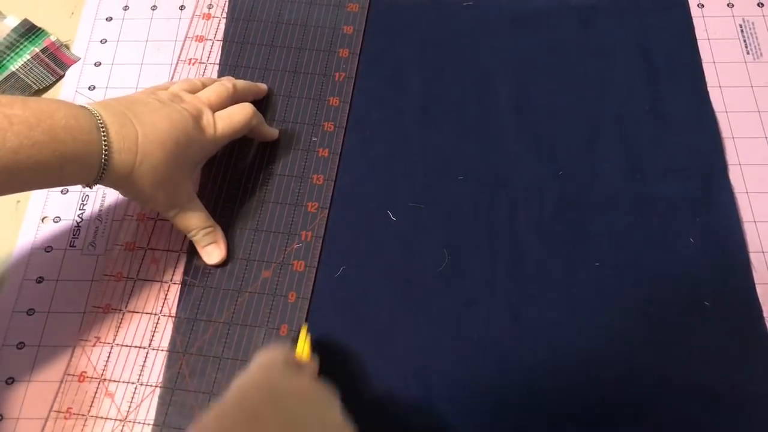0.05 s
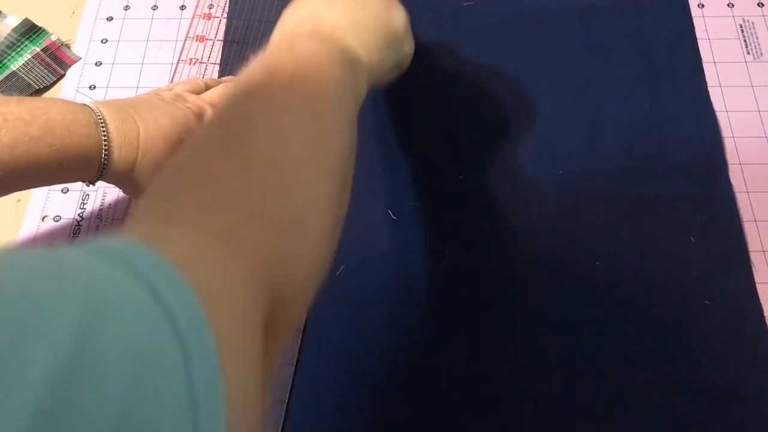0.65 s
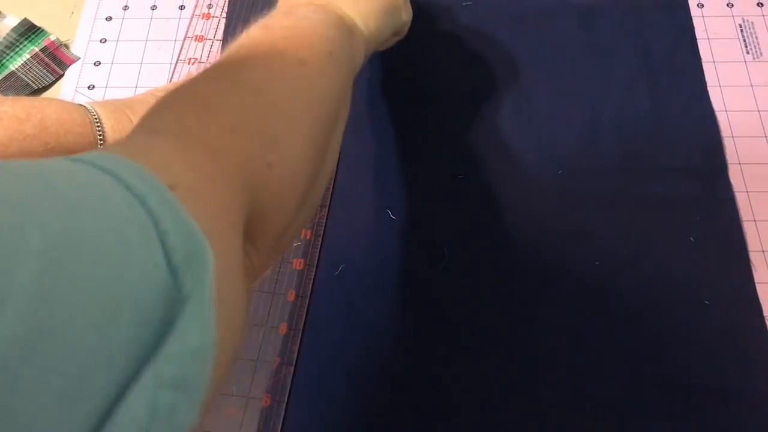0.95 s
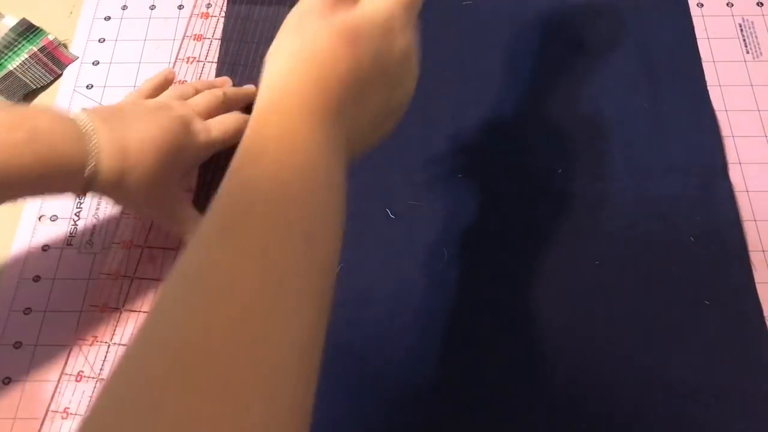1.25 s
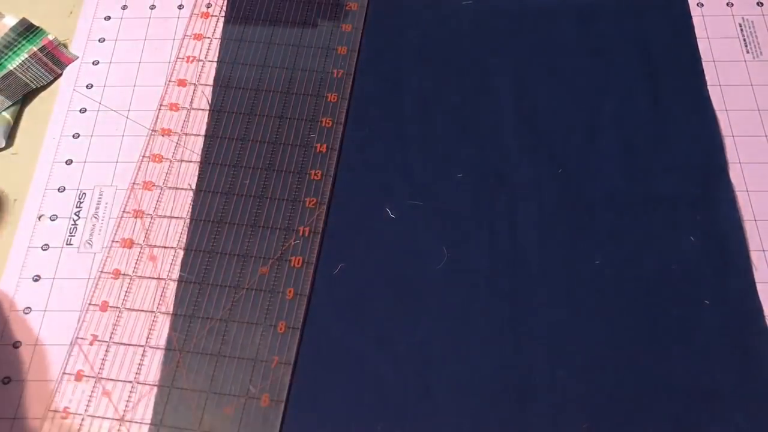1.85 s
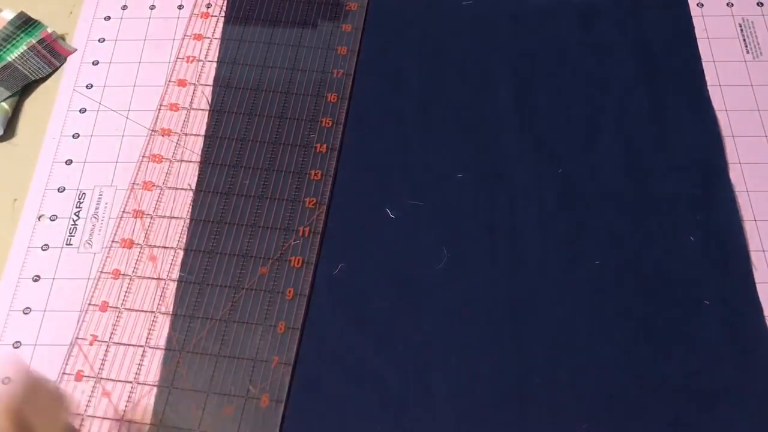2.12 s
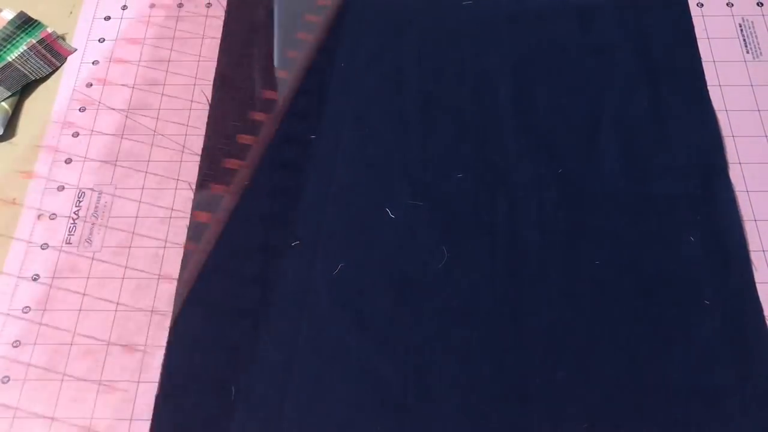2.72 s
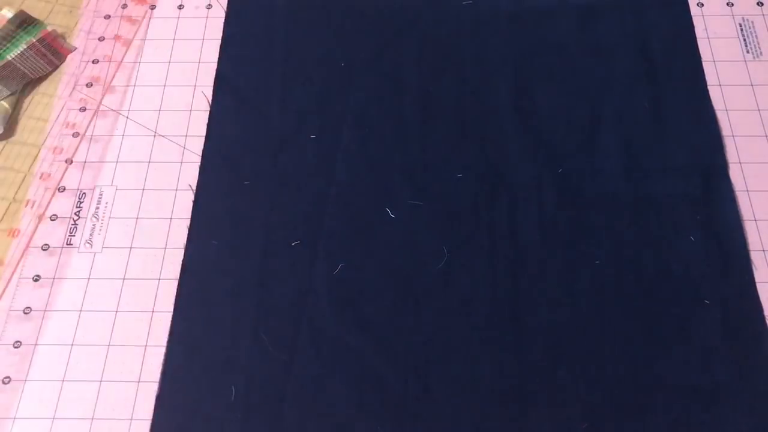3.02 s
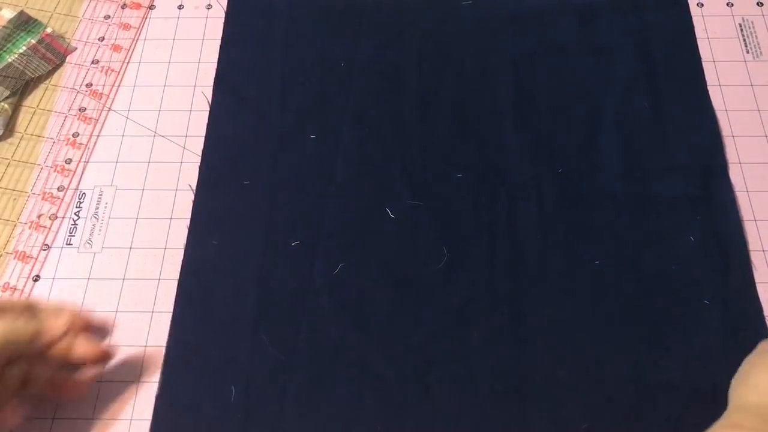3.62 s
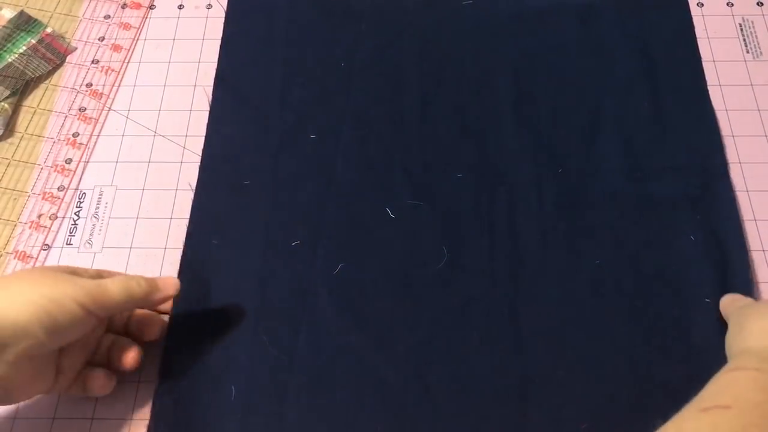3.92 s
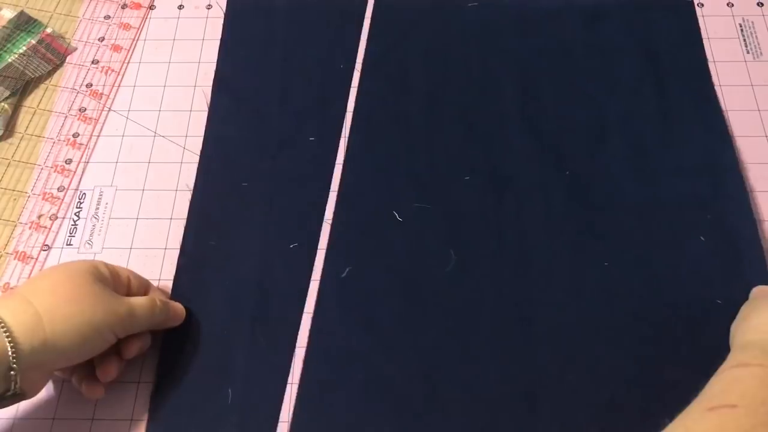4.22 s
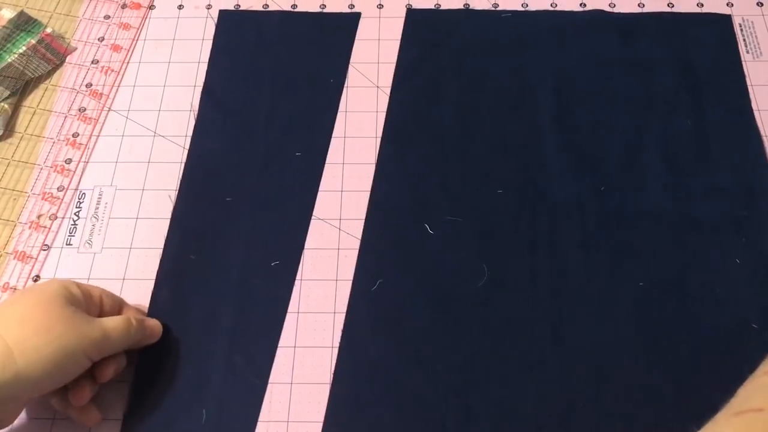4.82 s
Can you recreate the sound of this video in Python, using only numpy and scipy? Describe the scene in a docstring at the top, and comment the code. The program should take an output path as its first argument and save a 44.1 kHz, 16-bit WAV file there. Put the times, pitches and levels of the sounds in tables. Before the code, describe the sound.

A cutting wheel rumbles and crunches through cloth, then clatters onto a table before a plastic ruler taps and fabric slides.

```python
"""A rotary cutter rolls through cloth along a plastic ruler: the wheel rumbles on the mat, threads part.
Its guard clicks, then it is put down, and the impacts excite its body, its hollow handle and the table.
The ruler taps and slides aside, an arm brushes a hollow stand, and the cut strip is drawn away;
each rubbing sound is stick-slip friction filtered by the resonances of the body rubbed.
The room is small; elsewhere in the house a machine hums as it unevenly spins up."""
import sys
import numpy as np
from scipy import signal
from scipy.fft import rfft, irfft, next_fast_len
from scipy.io import wavfile
from scipy.ndimage import uniform_filter1d, map_coordinates

SR = 44100
rng = np.random.default_rng(int(sys.argv[2]) if len(sys.argv) > 2 else 0)


def file_out(sig):
    """Save sig as 16-bit WAV at sys.argv[1]."""
    # one column per channel
    cols = np.atleast_2d(sig).T
    # limit, then scale
    lim = np.clip(cols, -1, 1)
    pcm = np.round(lim * 32767).astype(np.int16)
    wavfile.write(sys.argv[1], SR, pcm)


N = 223417

# the cutter meeting the table: t/s, body level/dB, contact t60/s, tilt/(dB/decade), handle level/dB
LANDINGS = [(1.9548, -32, 0.015, -2, -65), (1.958, -34.5, 0.0086, -4, -51), (2.0498, -17, 0.0087, 1, -11),
            (2.054, -24.5, 0.03, -4, -30), (2.061, -32, 0.013, 4, -38), (2.073, -29, 0.028, -5.5, -39),
            (2.077, -26.5, 0.021, -8.5, -36)]


def cutting():
    """Common excitation: one push drives the sounds of the cut, which die as the wheel leaves the cloth."""
    push = [(0, -2.5), (.12, -1.6), (.2, 0), (.275, 0.9), (.325, -1.3), (.44, 1.2), (.525, -1.2),
            (.61, -1.0), (.7, -3.5), (.77, -6.5), (.86, -12.5), (.89, -10.5)]  # easing as the arm stretches out: t/s, level/dB
    run_off_s, decay_db_per_s = push[-2][0], 330
    t = np.arange(N) / SR
    push_db = np.interp(t, *np.transpose(push))
    pressure = wobble(55.3)
    out = table_tone(push_db) + wheel_rumble(push_db, pressure) + thread_crunch(push_db, pressure)
    out += blade_rasp()
    out *= amp(-decay_db_per_s * np.maximum(t - run_off_s, 0))
    return out + thread_snaps()


def wheel_rumble(push_db, pressure):
    """Rolling noise: small slips of the wheel on the mat, growing faster than the push."""
    spectrum = [(100, -22.5), (190, -6), (260, -1.5), (335, -2.5), (430, -2), (520, -3.5), (640, -5),
                (830, -8), (1050, -11.5), (1180, -5), (1300, -32), (2500, -31.5)]  # wheel on mat: f/Hz, level/dB
    rumble = shifting(friction(spectrum, rate=2500, spread_db=1.0), depth_db=1.0, size=2048, frames=5)
    return amp(-48.5 + 1.82 * push_db + 0.18 * pressure) * rumble


def table_tone(push_db):
    """Driven resonance: under a firm push the table top sings a narrow band of noise."""
    pitch = [(0.08, 322.2), (0.16, 256.5), (0.22, 335), (0.48, 348), (0.56, 321.5), (0.63, 264.8),
             (0.8, 265)]  # the note shifts as the wheel travels: t/s, f/Hz
    phase = 2 * np.pi * np.cumsum(np.interp(np.arange(N) / SR, *np.transpose(pitch))) / SR
    width_hz = 55
    tone = unit(wobble(width_hz) * np.cos(phase) + wobble(width_hz) * np.sin(phase))
    return amp(-54.5 + 1.5 * push_db) * tone


def thread_crunch(push_db, pressure):
    """Fracture noise: thousands of fine threads part each second and merge into a crunch."""
    spectrum = [(600, -11.5), (1150, -4), (1500, -12), (2100, -9), (2700, -6.3), (3340, -5.5), (3900, -8),
                (4600, -7.5), (6800, -11), (8850, -14), (10300, -20), (11500, -17.5), (13000, -17),
                (14000, -18.5), (16000, -30)]  # parting threads: f/Hz, level/dB
    crunch = shifting(friction(spectrum, rate=7000, spread_db=0.5), depth_db=2.1)
    return amp(-49.5 + push_db + 0.37 * pressure) * crunch


def thread_snaps():
    """Impulsive fracture: each thick thread breaks under the blade with a click of its own."""
    snaps = [(0.092, -48), (0.193, -35.5), (0.2792, -33), (0.366, -36), (0.4521, -33.5), (0.752, -37.5)]  # t/s, relative level/dB
    spectrum = [(800, 3.0), (2800, 6.5), (7000, 4.0), (16000, -15.5)]  # f/Hz, level/dB
    out = np.zeros(N)
    for s, db in snaps:
        add(out, s, amp(db + 1.0) * blow(spectrum, t60=0.0098, grit=2.1))
    return shifting(out, depth_db=4.0, size=128)


def blade_rasp():
    """Stick-slip friction: now and then the blade leans on the ruler."""
    moves = [(.13, -57, 0.075, 0.026, 0.24), (.53, -57, 0.18, 0.041, 0.18), (.7, -53.5, 0.13, .02, 0.29)]  # t/s, level/dB, rise/s, hold/s, fall/s
    spectrum = [(600, -17), (1150, -3.5), (1450, 2.5), (1800, 2.5), (2200, -10), (2700, -3), (3200, -18),
                (8000, -37)]  # blade on plastic: f/Hz, level/dB
    return rubs(moves) * friction(spectrum, rate=1500, spread_db=2.5)


def guard():
    """Friction and impact: the blade guard slides and clicks; the grip selects which handle mode rings."""
    slide = [(1.6, -61, 0.24, 0.013, .04)]  # t/s, level/dB, rise/s, hold/s, fall/s
    clicks = [(1.091, -44.5, 3470, 18), (1.4991, -36.5, 2060, 23), (1.6026, -42, 1400, 0),
              (1.606, -39.5, 1400, 5), (1.616, -35.5, 1420, 23), (1.62, -37.5, 2150, 15),
              (1.6821, -34.5, 3100, -1)]  # t/s, relative level/dB, mode f/Hz, mode boost/dB
    spectrum = [(100, -20), (300, -28), (800, -4.5), (1400, -14), (2000, -18.5), (3000, -4.5), (4600, -7),
                (5500, 6), (6200, 1.5), (7000, -0.5), (8000, -10.5), (13000, -14), (16000, -24)]  # the guard inside the closed hand: f/Hz, level/dB
    out = rubs(slide) * friction(spectrum, rate=4000, spread_db=13.0)
    for s, db, hz, boost_db in clicks:
        body = peaked(spectrum, [(hz, 0.37 * hz, boost_db)])
        add(out, s, amp(db - 3.5) * blow(body, t60=0.011, grit=3.7))
    return out


def cutter_landing():
    """Hard impact: brief broadband contacts as the cutter lands heel first and rattles flat."""
    spectrum = [(150, -5), (340, -1), (480, -8.5), (660, -18), (950, -17.5), (1150, -5), (1380, -11),
                (1800, -5), (2150, -5.5), (2650, -3.5), (3100, -1), (3800, -2.5), (4500, -8), (6000, -10),
                (8000, -13.5), (10300, -17.5), (13000, -14), (16000, -28.5)]  # its hard body: f/Hz, level/dB
    out = np.zeros(N)
    for s, db, t60, tilt_db, _ in LANDINGS:
        add(out, s, amp(db) * blow(tilted(spectrum, tilt_db), t60, grit=4.0))
    return out


def handle_pop():
    """Damped free vibration: each landing rings the hollow handle for a few cycles."""
    modes = [(1420, -3.5, 0.0081), (1663, -2, 0.0074), (3160, -10.5, 0.01), (3750, -12.5, 0.011),
             (5450, -7.5, 0.0052)]  # f/Hz, relative level/dB, t60/s
    out, t = np.zeros(N), np.arange(SR // 8) / SR
    hz, mode_db, t60 = np.transpose(modes)[:, :, None]
    partials = amp(mode_db - 60 * t / t60) * np.sin(2 * np.pi * hz * t)
    attack = 1 - np.exp(-t / 0.0013)
    pop = partials.sum(axis=0) * attack
    for s, *_, db in LANDINGS:
        add(out, s, amp(db) * pop / abs(pop).max())
    return out


def table_thuds():
    """Modal response: a soft blow excites one band of table modes; a resting hand or tool damps them."""
    thuds = [(1.092, -47, 380, 0.54), (1.956, -22.5, 573, 0.33), (1.958, -21.5, 153, 0.65),
             (1.993, -24, 100, 0.54), (2.052, -24.5, 365, 0.7), (2.0802, -18, 280, 0.29),
             (2.116, -31, 226, 0.38), (2.705, -39, 167, 1.73), (3.221, -38.5, 259, 1.5),
             (3.243, -50, 279.8, 1.2), (3.365, -54, 310, 2.5), (3.618, -44, 252, 0.37),
             (3.83, -40, 195, 0.93)]  # t/s, level/dB, band centre f/Hz, factor on t60
    modes = [(119.75, 1.5, 0.13), (168, 3, 0.079), (231, -0.5, 0.059), (280.4, 3.5, 0.048),
             (348, -3.5, 0.077), (415, -6, 0.047), (560, 5.5, 0.037), (756, -28, 0.044)]  # f/Hz, relative level/dB, nominal t60/s
    half_width_octaves = 0.34
    out, t = np.zeros(N), np.arange(SR // 4) / SR
    hz, mode_db, t60 = np.transpose(modes)[:, :, None]
    attack = 1 - np.exp(-t / 0.0014)
    for s, db, centre_hz, ring in thuds:
        excitation = np.exp(-(np.log2(hz / centre_hz) / half_width_octaves) ** 2)
        partials = excitation * amp(db + mode_db - 60 * t / (ring * t60)) * np.sin(2 * np.pi * hz * t)
        add(out, s, partials.sum(axis=0) * attack)
    return out


def plastic_slides():
    """Friction-driven bending modes: a sliding edge chatters and rings as far as the cloth allows."""
    # first the cutter, then the ruler: t/s, level/dB, rise/s, hold/s, fall/s, freedom to ring (0-1)
    slides = [(2.123, -50, 0.018, 0.0031, 0.062, 0.6), (2.498, -56.5, 0.0079, 0.0041, 0.012, 0.5),
              (2.705, -64, 0.061, 0.026, 0.066, 0.3), (2.764, -58.5, 0.011, .003, 0.012, 0.4),
              (2.92, -52.5, 0.004, 0.022, 0.049, 1), (2.972, -56.5, 0.013, 0.02, 0.064, 0.86),
              (3.024, -63.5, 0.03, 0.02, 0.051, 0.9), (3.238, -58, 0.031, .003, 0.035, 0.5)]
    spectrum = [(200, 8.5), (420, -1), (700, -1.5), (1400, -8), (2100, -8), (4000, -3), (7500, -12.5),
                (12000, -8.5), (16000, -13.5)]  # the sliding edge: f/Hz, level/dB
    modes = [(690, 240, 6.5), (990, 130, 10.5), (1710, 340, 16.5), (2420, 130, 8), (2830, 300, 15),
             (3310, 160, 5), (4100, 400, 2.5), (5700, 600, 7), (9000, 1200, 11.5)]  # the ruler bending: f/Hz, width/Hz, boost when free/dB
    out = np.zeros(N)
    for *move, freedom in slides:
        body = peaked(spectrum, [(hz, width, freedom * db) for hz, width, db in modes])
        out += rubs([move]) * friction(body, rate=4700, spread_db=5.0)
    return shifting(out, depth_db=3.0, frames=6) * amp(1.8 * wobble(83))


def ruler_taps():
    """Light impact: ruler and fingers tap, and a harder contact sounds brighter."""
    taps = [(1.164, -52.5, 8), (1.279, -50.5, 8), (1.3586, -47.5, -7), (1.3771, -49.5, 2),
            (2.491, -51.5, -1), (2.499, -56, -4), (2.698, -36.5, -4), (2.6998, -36, 3), (2.7013, -27, 2),
            (2.915, -46, 6), (3.22, -44, -23), (3.242, -36.5, -5), (3.245, -37, -17), (3.31, -43.5, -15),
            (3.323, -42, 16), (3.365, -41.5, 3), (3.429, -49, 15), (3.505, -52.5, 12)]  # t/s, level/dB, tilt/(dB/decade)
    spectrum = [(150, -2.5), (300, 3), (520, -8), (700, -2.5), (950, 3.5), (1160, 3), (1380, -2),
                (1800, -6), (2500, -2), (3000, 0), (3450, -5), (4100, -4), (5360, -6), (7500, -11),
                (8700, -5), (10500, -13.5), (13100, -9.5), (14400, -18), (16000, -18.5)]  # struck plastic: f/Hz, level/dB
    out = np.zeros(N)
    for s, db, tilt_db in taps:
        add(out, s, amp(db) * blow(tilted(spectrum, tilt_db), t60=0.0075, grit=2.5))
    return out


def cloth():
    """Fibre friction: dense slips rustle under hands and sleeves; light sliding gives a fine high hiss."""
    sweeps = [(.9, -72.5, 0.37, 0.057, 0.33), (1.11, -66.5, 0.43, 0.012, 0.038),
              (1.6, -62.5, 0.69, 0.0057, 0.09), (2.02, -63.5, 0.074, 0.066, 0.12),
              (2.22, -65, 0.36, 0.048, 0.047), (2.585, -62, 0.074, 0.01, 0.036),
              (2.68, -65.5, 0.12, 0.0094, 0.1), (3.32, -64.5, 0.13, 0.1, 0.63),
              (3.65, -67, 0.22, 0.48, 0.19), (4.52, -74, .15, 0.022, 0.23)]  # hands and sleeves: t/s, level/dB, rise/s, hold/s, fall/s
    # fingertips, the skidding cutter, the lifted cloth: t/s, level/dB, rise/s, hold/s, fall/s
    glides = [(1.12, -71, .08, 0.092, 0.33), (1.56, -67, .15, 0.03, .04), (2.12, -62, .02, .02, .06),
              (5.02, -71.5, .08, .05, 0.11)]
    sweep_spectrum = [(200, 8.5), (600, 1), (1400, 4), (2400, 2.5), (4200, -3.5), (5500, -2), (6800, -7.5),
                      (8000, -11), (13000, -10), (16000, -18.5)]  # f/Hz, level/dB
    glide_spectrum = [(2000, -14), (7000, -1), (10300, -3), (13000, -2), (16000, 2)]  # f/Hz, level/dB
    motion = np.hypot(rubs(sweeps), amp(-84))  # the hands never lie quite still
    rustle = motion * friction(sweep_spectrum, rate=7000, spread_db=0.5)
    hiss = rubs(glides) * friction(glide_spectrum, rate=12000, spread_db=4.0)
    return (rustle + hiss) * amp(1.9 * wobble(35))


def stand_and_strip():
    """Friction and resonance: an arm brushes a hollow stand, then the cut strip slides over the mat."""
    brushes = [(3.66, -60, 0.036, 0.0043, 0.072), (3.706, -42, 0.013, 0.024, 0.049),
               (3.846, -38.5, 0.029, 0.015, 0.092), (4.03, -73, .1, 0.09, 0.28),
               (4.3, -78.5, 0.2, 0.39, 0.3), (4.5, -71.5, 0.097, 0.082, 0.12),
               (4.715, -71, 0.11, 0.01, 0.055), (4.83, -65.5, 0.05, 0.017, 0.032),
               (4.978, -69.5, 0.031, 0.0086, .04)]  # the arm, from 4.5 s the strip: t/s, level/dB, rise/s, hold/s, fall/s
    catches = [(3.275, -30.5), (3.281, -35), (3.299, -43), (3.616, -39.5), (3.652, -32), (3.696, -37),
               (3.7244, -29), (3.7285, -22), (3.734, -29), (3.769, -34), (3.8279, -22), (3.844, -37),
               (3.848, -25), (4.085, -37)]  # the stand catching and letting go: t/s, relative level/dB
    spectrum = [(200, -19.5), (320, -10.5), (440, -23.5), (550, -30.5), (800, -15), (1000, 1), (1380, 1),
                (1600, -6), (1900, -9), (2250, -16), (3000, -23), (5200, -22), (6500, -33), (10000, -39.5),
                (16000, -48)]  # hollow band shared by all rubs and catches: f/Hz, level/dB
    modes = [(1070, 39, 4), (1205, 43, 1), (1410, 42, 4), (1782, 50, 4), (2770, 100, 9)]  # resonances colouring the rubs: f/Hz, width/Hz, boost/dB
    hiss_spectrum = [(1200, -13), (2200, 10), (3400, 15), (5300, -1), (6300, -12), (9000, -16),
                     (16000, -44)]  # firmly brushed fabric: f/Hz, level/dB
    force = rubs(brushes)
    out = force * amp(1.6 * wobble(60)) * friction(peaked(spectrum, modes), rate=8900, spread_db=3.0)
    hiss_gain = force * np.sqrt(force / force.max()) * amp(-14.5)
    out += hiss_gain * friction(hiss_spectrum, rate=3000, spread_db=1.5)
    for s, db in catches:
        add(out, s, amp(db - 7.0) * blow(tilted(spectrum, tilt_db=-9.0), t60=0.018, grit=0.61))
    return out


def machine():
    """Rotational harmonics: multiples of a distant machine's speed glide through the room modes."""
    spin = [(0, 10.65), (0.999, 14.8), (1.598, 15.4), (2.402, 15.7), (3, 16.3), (3.498, 19.5), (4, 16.4),
            (4.502, 18.5), (5.07, 19.9)]  # t/s, rotation f/Hz
    orders = [(5, -48.5), (7, -56.5), (8, -53.5), (13, -57)]  # multiple of the rotation, source level/dB
    transmission = [(55, -11), (70, -23.5), (79, -2), (85, 1), (90, -2.5), (95, -6.5), (101, -35),
                    (109, -11), (119, -4), (131, -0.5), (141, -3), (144, -8), (152, -14.5), (162, -4),
                    (185, -14.5), (240, -14)]  # through walls and room modes: f/Hz, gain/dB
    spin_hz = np.interp(np.arange(N) / SR, *np.transpose(spin))
    angle = 2 * np.pi * np.cumsum(spin_hz) / SR
    out = np.zeros(N)
    for order, db in orders:
        level_db = db + along(transmission, order * spin_hz) + 1.64 * wobble(8.8)
        out += amp(level_db) * np.sin(order * angle + 0.066 * wobble(41.0))
    return out


def air():
    """Stationary noise: the still room has a faint floor, strongest in the bass."""
    spectrum = [(12, -72), (20, -4.5), (60, 2), (120, -1.5), (193, -10), (357, -16.5), (399, -21.5),
                (624, -24.5), (825, -27.5), (1370, -29), (2140, -32.5), (5380, -34.5), (10200, -39),
                (13200, -37), (16000, -42)]  # f/Hz, relative level/dB
    return amp(-57.0) * unit(coloured(rng.standard_normal(N), spectrum))


def room(x):
    """Reverberation: a short diffuse tail builds up, then decays exponentially, the bass slowest."""
    decay = [(150, 0.28), (1000, 0.2), (4000, 0.16), (15000, 0.16)]  # f/Hz, t60/s
    hz, t, noise = signal.stft(rng.standard_normal(SR // 2), SR, nperseg=256)
    envelope = amp(-60 * t / along(decay, hz)[:, None]) * (1 - np.exp(-t / 0.00047))
    tail = signal.istft(noise * envelope, SR, nperseg=256)[1]
    return signal.fftconvolve(x, tail / np.linalg.norm(tail))[:N]


def friction(spectrum, rate, spread_db):
    """Stick-slip: random slips of uneven size, rate a second, ring a body; rms 1."""
    slips = (rng.random(N) < rate / SR) * rng.standard_normal(N)
    slips *= amp(spread_db * np.clip(rng.standard_normal(N), -2, 2))
    return unit(coloured(slips, spectrum))


def rubs(moves):
    """Incoherent addition: the gain of rubbing moves that swell, hold and fade, summed in power."""
    swing_db = 20  # spanned by one rise or fall time
    t = np.arange(N) / SR
    power = np.zeros(N)
    for s, db, rise, hold, fall in moves:
        away = np.maximum(s - t, 0) / rise + np.maximum(t - s - hold, 0) / fall
        power += amp(db - swing_db * away) ** 2
    return np.sqrt(power)


def blow(spectrum, t60, grit):
    """Impact: an impulse and a dying crackle, weighted by grit, drive a body; envelope peak near 1."""
    t = np.arange(SR // 4) / SR
    crackle = rng.standard_normal(len(t)) * amp(-60 * t / t60)
    force = rfft((t == 0) + grit * crackle / np.linalg.norm(crackle))
    white_force = irfft(force / abs(force))[:SR // 8]  # the body alone gives the colour
    sound = coloured(white_force, spectrum)
    power = uniform_filter1d(sound ** 2, size=44, mode="constant")
    return sound / np.sqrt(2 * power.max())


def shifting(x, depth_db, size=512, frames=10):
    """Modal coupling: a travelling contact favours changing bands at random; the overall level stays."""
    bands = signal.stft(x, nperseg=size)[2]
    field = uniform_filter1d(rng.standard_normal(bands.shape), size=3, axis=0)
    field = uniform_filter1d(field, size=frames, axis=1)
    shifted = signal.istft(bands * amp(depth_db * unit(field)), nperseg=size)[1][:N]
    return x.std() * unit(shifted)


def coloured(x, spectrum):
    """Minimum-phase filtering: a causal response of unit energy, shaped by (f/Hz, level/dB) points."""
    size = 8192
    cepstrum = irfft(np.log(amp(along(spectrum, np.fft.rfftfreq(size, 1 / SR)))))
    cepstrum[1:size // 2] *= 2
    cepstrum[size // 2 + 1:] = 0
    response = irfft(np.exp(rfft(cepstrum)))
    return signal.fftconvolve(x, response / np.linalg.norm(response))[:len(x)]


def peaked(spectrum, modes):
    """Resonance: peaks (f/Hz, width/Hz, boost/dB) raised on a spectrum."""
    hz = np.geomspace(100, SR / 2, num=400)
    boost_db = sum(db / (1 + (2 * (hz - centre) / width) ** 2) for centre, width, db in modes)
    return np.column_stack([hz, along(spectrum, hz) + boost_db])


def tilted(spectrum, tilt_db):
    """Spectral tilt of tilt_db a decade: a harder contact is brighter."""
    return [(hz, db + tilt_db * np.log10(hz)) for hz, db in spectrum]


def wobble(rate):
    """Smooth random modulation, rate knots a second."""
    return map_coordinates(rng.standard_normal(int(N * rate / SR) + 4), [np.arange(N) * rate / SR])


def along(points, hz):
    """Interpolation of (f/Hz, value) points on a logarithmic frequency axis."""
    f, values = np.transpose(points)
    return np.interp(np.log(hz + 1), np.log(f + 1), values)


def amp(db):
    """Level in decibels to amplitude ratio."""
    return 10 ** (np.asarray(db) / 20)


def unit(x):
    """Normalisation to rms 1."""
    return x / np.sqrt(np.mean(x ** 2) + 1e-20)


def add(track, s, sound):
    """Superposition of a sound on a track at time s."""
    start = round(s * SR)
    track[start:start + len(sound)] += sound[:N - start]


def scene():
    """Direct plus reverberant sound: each source excites the room from its own place."""
    sources = [  # sound, reverberant level re direct/dB
        (cutting(), -6), (guard(), -18), (cutter_landing(), -4.5), (handle_pop(), -11),
        (table_thuds(), -14), (plastic_slides() + ruler_taps(), -5), (cloth(), -5),
        (stand_and_strip(), -12)]
    foreground = sum(direct + amp(room_db) * room(direct) for direct, room_db in sources)
    return (foreground + air() + machine())[None]


def record(dry):
    """Band limiting: a high-pass thins the deep bass and a sharp cut removes the highest treble."""
    low_hz, top_hz = 42, 16200
    thin = signal.sosfilt(signal.butter(2, low_hz, "highpass", fs=SR, output="sos"), dry)
    size = next_fast_len(N + SR // 2)
    passband = np.fft.rfftfreq(size, 1 / SR) < top_hz
    return irfft(rfft(thin, size) * passband, size)[..., :N]


dry = scene()
out = record(dry)
file_out(out)
```